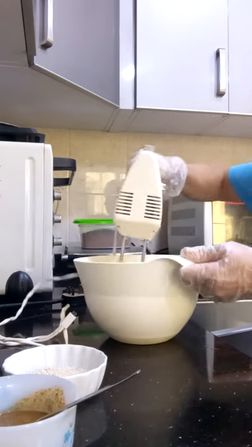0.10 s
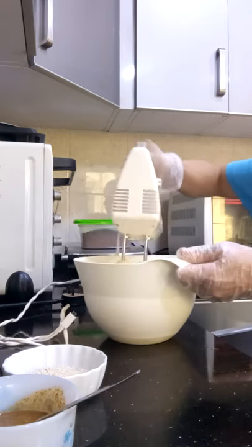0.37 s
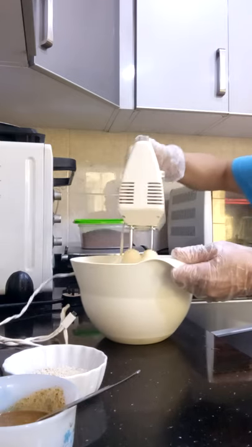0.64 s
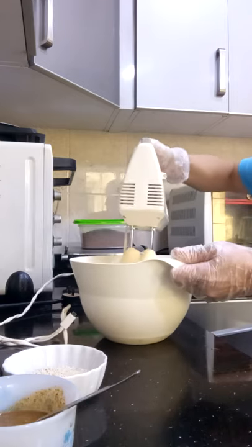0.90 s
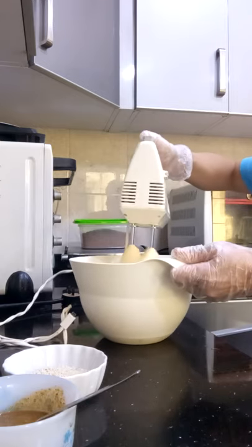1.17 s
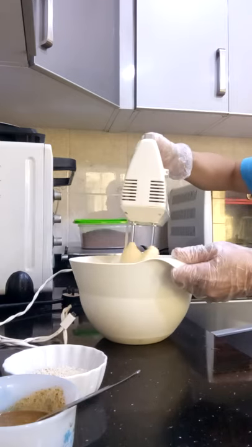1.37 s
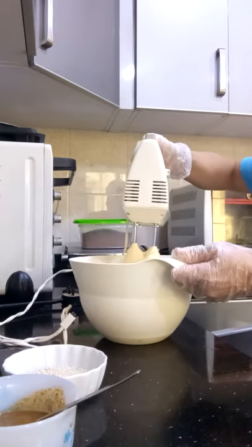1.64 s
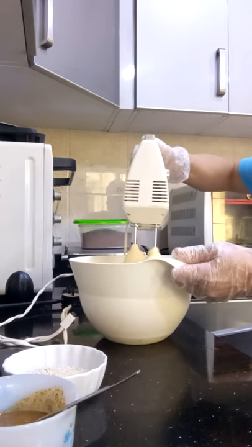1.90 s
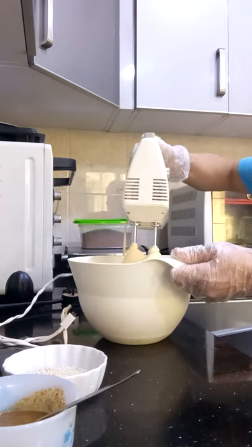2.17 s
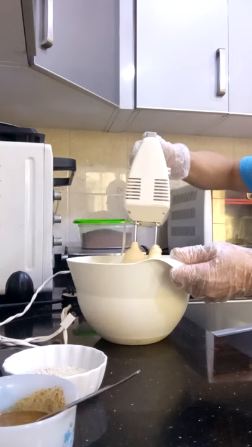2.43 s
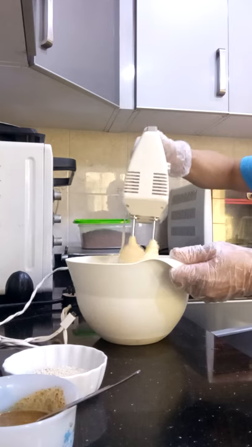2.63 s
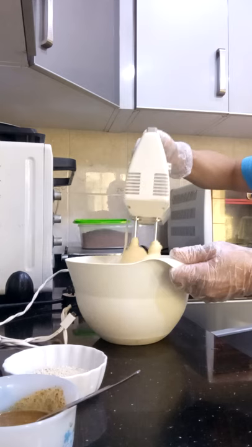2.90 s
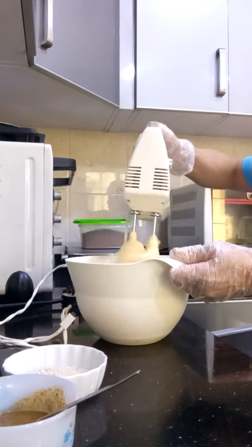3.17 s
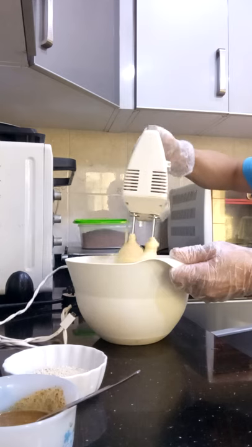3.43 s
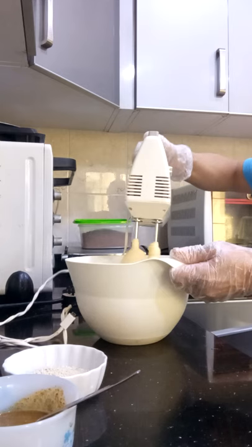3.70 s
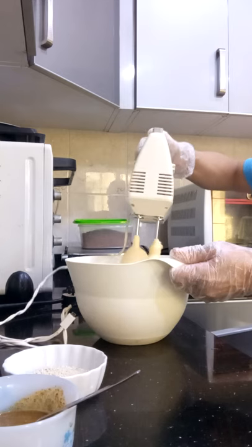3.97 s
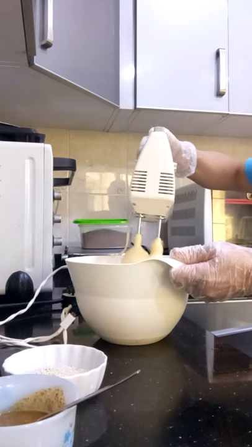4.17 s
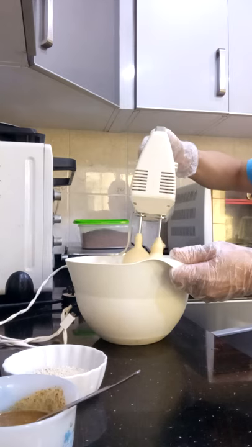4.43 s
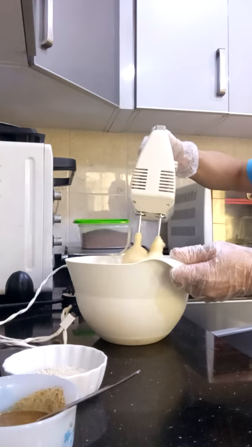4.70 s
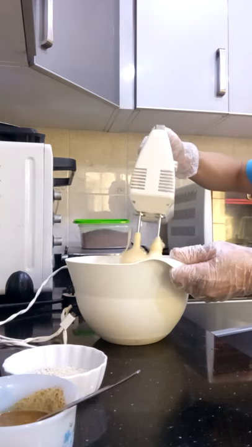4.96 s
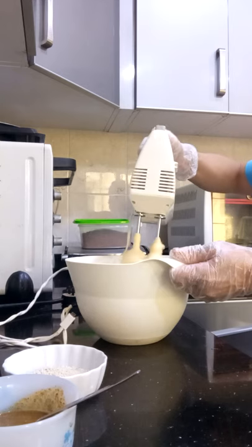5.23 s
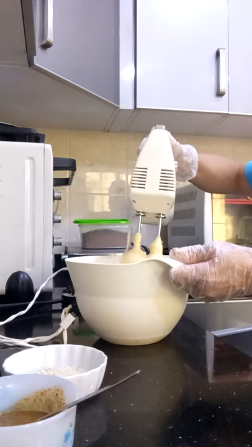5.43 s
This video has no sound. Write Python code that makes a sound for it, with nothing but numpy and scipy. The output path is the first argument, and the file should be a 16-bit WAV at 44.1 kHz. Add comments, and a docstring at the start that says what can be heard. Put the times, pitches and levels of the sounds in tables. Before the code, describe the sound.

A hand mixer runs close by in a small tiled kitchen, its motor whining over a rattling plastic roar and airy hiss. The bowl knocks quickly at the start. Switch clicks lower the speed, then raise it. Later the motor is cut, slides down in pitch and revs up again, followed by two shorter cuts and restarts. One microphone, centred, with a short bright echo.

```python
"""A hand mixer beats batter on a kitchen counter. Its mains motor whines at the commutator rate and roars
through the plastic housing; the thumb switch clicks through speeds and off, and the motor coasts down and
spins up. The bowl knocks on the counter, tiled walls answer and the kitchen hums faintly.
One microphone hears it all; everything but the clicks dips for a moment around each click."""
import sys
import numpy as np
from scipy import signal
from scipy.fft import rfft, irfft, next_fast_len
from scipy.io import wavfile
from scipy.ndimage import uniform_filter1d, map_coordinates

SR = 44100
rng = np.random.default_rng(int(sys.argv[2]) if len(sys.argv) > 2 else 0)


def wav_record(signal):
    """Record a signal, one row per channel, as 16-bit PCM in the file named by sys.argv[1]."""
    frames = np.transpose(np.atleast_2d(signal))
    bounded = np.clip(frames, -1, 1)
    # unit amplitude maps onto the largest positive 16-bit level
    quanta = np.round(bounded * 32767).astype(np.int16)
    wavfile.write(sys.argv[1], SR, quanta)


def volts_from_db(level):
    """Convert decibel levels to linear amplitude ratios."""
    exponent = np.asarray(level, float) / 20
    return 10 ** exponent


N = 246509
T = np.arange(N) / SR  # s
BARS = 12  # commutator bars
FULL_RPS = 180  # shaft turns per s at which the motor levels are stated

# presses of the thumb switch: click_s, click_level_db, dip_weight_db (scaled by the curve of the dip)
SWITCH_CLICKS = [(0.857, -20, -7.5), (1.933, -12, -6.5), (2.6113, -18.5, -2.5), (3.028, -15.5, -5.5),
                 (3.7078, -16.5, -4), (3.7472, -16.5, -1.5), (4.3358, -15.5, -7.5), (4.556, -15, -9),
                 (5.069, -17, -7.5), (5.3096, -12.5, -7)]
# depth of the mains throb on the 1st, 2nd and 3rd harmonic of the whine: depth_ratio
THROB_DEPTHS = [.8, .4, .55]


def unit(x):
    """Scale to rms 1."""
    return x / np.sqrt(np.mean(x ** 2) + 1e-20)


def filtered(x, response):
    """x times a complex response of frequency."""
    m = next_fast_len(N + 8192)
    return irfft(rfft(x, m) * response(np.fft.rfftfreq(m, 1 / SR)), m)[:N]


def shaped(x, spectrum):
    """x coloured by a (Hz, dB) spectrum read on log Hz, at rms 1."""
    hz, db = np.transpose(spectrum)
    return unit(filtered(x, lambda f: volts_from_db(np.interp(np.log(f + 1), np.log(hz), db, -120, -120))))


def coloured(spectrum):
    """Coloured noise of rms 1."""
    return shaped(rng.standard_normal(N), spectrum)


def wobble(rate):
    """A smooth random curve, rate knots a second."""
    return map_coordinates(rng.standard_normal(int(N * rate / SR) + 4), [T * rate])


def powered():
    """1 while current flows, else 0."""
    # motor switched off: from_s, to_s
    off_spans = [(3.027, 3.707), (4.335, 4.555), (5.067, 5.308)]
    return 1 - sum((T > a) & (T < b) for a, b in off_spans)


def shaft_speed():
    """Under current the rotor lags towards its pull; without, friction brakes it, easing off near a crawl."""
    # speed that switch setting and batter load pull the shaft towards: time_s, turns_per_s
    pull_points = [(0.0, 178.1), (0.12, 163.7), (0.28, 164.9), (0.36, 174.6), (0.68, 188.1), (0.855, 185.9),
                   (0.857, 144.1), (1.932, 149.7), (1.934, 168.6), (2.55, 180.7), (2.72, 173.6),
                   (2.84, 191.7), (3.03, 161.0), (3.74, 76.4), (3.75, 181.2), (4.1, 187.0), (4.33, 204.7),
                   (4.56, 143.6), (4.62, 191.7), (4.78, 192.0), (5.07, 210.7), (5.31, 193.3), (5.6, 193.7)]
    start_rps, spin_up_s = 178, .16
    brake_rps_per_s, crawl_rps, ease = 315.1, 43.7, 3.8
    t = np.arange(0, N / SR + .002, .001)  # one step a millisecond
    pull = np.interp(t, *np.transpose(pull_points))
    on = np.interp(t, T, powered()) > .5
    speed = [start_rps]
    for goal, driven in zip(pull, on):
        now = speed[-1]
        if driven:
            push = (goal - now) / spin_up_s
        else:
            push = -brake_rps_per_s * np.tanh(now / crawl_rps) ** ease
        speed.append(now + push * t[1])
    return np.interp(T, t, speed[:-1])


def ripple(depth, lag):
    """Torque throbs at twice the mains rate while current flows."""
    mains_hz = 50
    return 1 + depth * powered() * np.cos(4 * np.pi * mains_hz * T - lag)


def housing(f):
    """Causal sum of the resonances of housing and bowl, alternating in sign."""
    # resonances: centre_hz, width_hz, relative_db
    resonances = [(599, 37, -15), (720.6, 35.7, -2), (965.5, 41, -7), (1047.7, 33.2, 3.5),
                  (1092.3, 39.3, 0), (1155, 32.4, -1), (1272, 21, -17.5), (1370, 16, -53),
                  (2085, 200, -15.5), (2922, 40, -5.5), (3116, 93, -10), (4210, 140, -13), (6920, 140, -12),
                  (7624, 91, -9)]
    return sum((-1) ** k * volts_from_db(db) * 1j * f * width / (centre ** 2 - f * f + 1j * f * width)
               for k, (centre, width, db) in enumerate(resonances))


def rotor_noise(turns, share, drift):
    """Noise of which a share repeats every shaft turn, its pattern drifting by drift patterns a second."""
    spots = 256  # rough spots around the rotor
    pattern = rng.standard_normal((int(N * drift / SR) + 4, spots))
    repeat = map_coordinates(pattern, [T * drift, turns % 1 * spots], mode="grid-wrap")
    share = np.clip(share, 0, 1)
    return np.sqrt(share) * unit(repeat) + np.sqrt(1 - share) * rng.standard_normal(N)


def commutator_line(k, db, turns, slack):
    """Harmonic k of the bar rate: an eccentric commutator swells it once a turn, bouncing brushes roughen it."""
    swell = 1 + .27 * np.cos(2 * np.pi * turns + wobble(3))
    rough = volts_from_db(1.2 * wobble(20)) * (1 + .2 * wobble(250))
    return volts_from_db(db) * swell * rough * np.sin(k * (2 * np.pi * BARS * turns + slack))


def commutator_whine(speed, turns, slack, coasting, facing_db):
    """Three harmonics, louder or softer as they sweep the resonances of the housing."""
    # whine under current: turns_per_s, first_db, second_db, third_db
    radiation = [(35, -64, -76, -66), (59.4, -44, -56, -65), (83.4, -26, -70, -39), (95.2, -17, -62, -46),
                 (110, -33, -51, -41), (124, -28, -29, -44), (131.7, -37, -29, -47),
                 (145, -42.5, -47.5, -58), (155, -43, -53, -51), (155, -41, -50.5, -50),
                 (161.7, -41, -45, -39), (173.1, -34.5, -39.5, -38), (172, -39.5, -38.5, -37.5),
                 (175.7, -37.5, -34.5, -40), (179.8, -37.5, -41, -42), (179, -39, -40, -41),
                 (181.5, -40.5, -36.5, -33.5), (198, -39, -47, -31)]
    # each harmonic coasting at full speed, before the housing colours it: level_db
    coast_db = [-41, -36, -42]
    # its fall per halving of speed, one per harmonic: fall_db
    coast_fall_db = [3.5, 9, 11]
    # how much of the facing each harmonic feels under current: ratio
    aims = [.6, 1.7, 1.2]
    ring_share = .55  # how strongly the housing colours the coasting whine
    rps, *radiated = np.transpose(radiation)
    whine = np.zeros(N)
    for i in range(3):
        k = i + 1
        driven_db = np.interp(speed, rps, radiated[i]) + aims[i] * facing_db
        # a coasting rotor is heard mostly where it crosses a housing resonance
        rung_db = ring_share * 20 * np.log10(np.abs(housing(k * BARS * speed)))
        free_db = coast_db[i] + coast_fall_db[i] * np.log2(speed / FULL_RPS) + rung_db
        db = (1 - coasting) * driven_db + coasting * free_db + 1.4 * wobble(11)
        whine += ripple(THROB_DEPTHS[i], 2.8) * commutator_line(k, db, turns, slack)
    return whine


def gear_rattle(turns):
    """Rough gear noise rings the housing, over a broad motor roar."""
    # roar under the resonances: frequency_hz, relative_db
    roar_spectrum = [(450, -38), (640, 1.5), (2000, 0), (4500, -9), (6000, -30)]
    teeth = rotor_noise(turns, share=0.21, drift=2.962) * volts_from_db(2.2 * wobble(300)) * ripple(.19, 3.9)
    return unit(filtered(teeth, housing)) + volts_from_db(-6) * shaped(teeth, roar_spectrum)


def fan_and_brushes(turns, slack):
    """Air and brush hiss, with thin upper lines of the commutator in it."""
    # hiss of fan air and brushes: frequency_hz, relative_db
    hiss_spectrum = [(2650, -6), (4500, -13.5), (4600, -8.5), (5220, -9.5), (5830, 0), (6310, 0),
                     (7750, -3), (8710, -11), (10000, -18), (11300, -14), (12900, -15.5), (13600, -21),
                     (14900, -3.5), (15900, -4)]
    # higher harmonics, before current and hiss spectrum scale them: multiple, level_db
    overtones = [(4, -14), (5, -20), (6, -13)]
    mesh = (31 / BARS, -22.5)  # a faint tone at 31 cycles per shaft turn, perhaps gear teeth
    lines = sum(commutator_line(k, db, turns, slack) for k, db in overtones + [mesh])
    # sparking edges sharpen the whine under current
    thin = (0.3 + 0.59 * powered()) * ripple(THROB_DEPTHS[2], 2.8) * lines
    air = rotor_noise(turns, share=0.22, drift=3.99) * ripple(0.03, 2.5)
    return shaped(air + thin, hiss_spectrum) * volts_from_db(0.33 * wobble(400))


def motor():
    """Commutator whine, gear rattle in the housing, rumble and hiss, all following the shaft."""
    # how squarely the vents face the microphone as the hand moves: time_s, facing_db
    facing = [(0, 3), (.1, 2), (.3, 1.5), (.5, 2.5), (.7, -1), (.85, -1.5), (1, 2), (1.2, 3), (1.6, 4),
              (2, 1), (2.25, -0.5), (2.5, 1), (2.7, -1), (3, -1.5), (3.5, -1.5), (3.9, 1), (4.15, -1),
              (4.3, -2), (4.7, 0), (5.05, -1.5), (5.3, 3), (5.59, -1.5)]
    # rumble through bowl and counter: frequency_hz, relative_db
    rumble_spectrum = [(30, -36), (60, -18), (88, -17.5), (100, -13.5), (150, 2.5), (180, -11), (199, 6.5),
                       (220, -14), (240, -2.5), (260, -11.5), (400, -9), (520, -13), (600, -76)]
    # each layer: full_speed_db, db_per_doubling_of_speed, hard_acceleration_db, without_current_db (last two added)
    rattle_layer = (-35, 10, 7, 0)
    air_layer = (-35, 11, 4.5, 1.9)
    rumble_layer = (-52.5, 0.3, -3, -2.5)
    # the field builds and collapses gently, which rounds the corners of the speed
    speed = uniform_filter1d(shaft_speed(), size=SR // 40)
    turns = np.cumsum(speed) / SR + 0.002 * wobble(40)
    facing_db = np.interp(T, *np.transpose(facing))
    gaining = np.clip(np.gradient(speed) * SR / 400, 0, 1)  # 1 from 400 turns per s per s
    coasting = uniform_filter1d(1. - powered(), size=SR // 50)
    # the gears chatter when coasting or gaining speed, and the upper lines blur
    slack = (.6 * coasting + .3 * gaining) * wobble(200)

    def level(full_db, slope_db, strain_db, off_db):
        return full_db + slope_db * np.log2(speed / FULL_RPS) + strain_db * gaining + off_db * coasting

    rattle_db = level(*rattle_layer) + 0.2 * facing_db + 1.4 * wobble(12)
    hiss_db = level(*air_layer) + .1 * facing_db + 1.0 * wobble(6.5)
    rumble_db = level(*rumble_layer) + 0.63 * facing_db + 2.47 * wobble(6)
    # the fan's air flow cannot change abruptly
    hiss_db = uniform_filter1d(hiss_db, size=SR // 16)
    # the beaters pass the bowl wall once every six shaft turns
    beat = 1 + .09 * np.cos(2 * np.pi * turns / 6)
    whine = commutator_whine(speed, turns, slack, coasting, facing_db)
    rumble = volts_from_db(rumble_db) * coloured(rumble_spectrum)
    rattle = volts_from_db(rattle_db) * gear_rattle(turns)
    hiss = volts_from_db(hiss_db) * fan_and_brushes(turns, slack)
    return whine + rumble + beat * (rattle + hiss)


def room(x):
    """Tiled walls answer with a dense tail whose treble dies first."""
    t = np.arange(SR // 2) / SR
    slow, fast = rng.standard_normal((2, len(t)))
    tail = uniform_filter1d(slow, size=5) * volts_from_db(-60 * t / 0.68) + 0.78 * fast * volts_from_db(-60 * t / 0.28)
    tail = np.pad(tail / np.linalg.norm(tail), (SR // 200, 0))  # the walls answer 5 ms late
    return signal.fftconvolve(x, tail)[:N]


def kitchen():
    """Room noise and slightly unsteady appliance whine."""
    # room noise: frequency_hz, relative_db
    room_spectrum = [(18, -59), (30, -26), (100, -4), (209, -17), (245, 6.5), (265, -24), (302, -2.5),
                     (436, -21), (718, -5.5), (3560, -78), (3850, -22), (4510, -15.5), (15900, -49)]
    # appliance whine, its level wavering: pitch_hz, mean_level_db
    appliance_tones = [(3995, -62.5)]
    tones = sum(volts_from_db(db + 5.1 * wobble(11)) * np.sin(2 * np.pi * hz * T + 0.23 * wobble(7.5))
                for hz, db in appliance_tones)
    noise_db = -61.0 + 1.6 * wobble(4.11) + 6.3 * wobble(30)
    return volts_from_db(noise_db) * coloured(room_spectrum) + tones


def knocks():
    """The bowl knocks on the counter: decaying modes, the high ones a short crack, the low ones a longer thud."""
    # knocks: start_s, level_db
    knock_times = [(0.113, -24), (.131, -17), (0.167, -21.5)]
    # modes of the plastic bowl: pitch_hz, relative_db, t60_s
    bowl_modes = [(147, -12, 0.098), (372, -7.5, 0.029), (624, 2.5, 0.014), (1032, 1, 0.021)]
    out = np.zeros(N)
    for s, db in knock_times:
        t = np.maximum(T - s, 0)
        modes = sum(volts_from_db(mode_db - 60 * t / t60) * np.sin(2 * np.pi * hz * t) for hz, mode_db, t60 in bowl_modes)
        out += volts_from_db(db) * (1 - np.exp(-t / 0.0026)) * modes
    return out


def dips():
    """The level drops just ahead of each click, holds, and slides back."""
    edges = [-.017, -.009, -.001, .004, .03, .055]  # s around the click
    weights = [0.0091, 1.43, 1.9, 1.76, 1.2, 0.038]
    return volts_from_db(sum(dip_db * np.interp(T - s, edges, weights) for s, _, dip_db in SWITCH_CLICKS))


def switch():
    """Each click is a bright snap, a weaker, longer room tail and a ring of the housing."""
    # switch snap: frequency_hz, relative_db
    snap_spectrum = [(240, -65), (400, -54), (734, 10.5), (1100, 7.5), (1410, -2), (3030, 5), (5730, -2.5),
                     (7230, 10.5), (12300, -8), (15300, 15), (16500, -32)]
    snap, tail = coloured(snap_spectrum), coloured(snap_spectrum)
    body = unit(filtered(rng.standard_normal(N), housing))
    out = np.zeros(N)
    for s, db, _ in SWITCH_CLICKS:
        t = np.maximum(T - s + 0.0013, 0)
        rise = 1 - np.exp(-t / .0006)
        out += volts_from_db(db - 10) * rise * (volts_from_db(-60 * t / 0.044) * snap + volts_from_db(-12.5 - 60 * t / 0.28) * tail)
        out += volts_from_db(db - 27.5 - 60 * t / 0.31) * rise * body
    return out


def scene():
    """Everything reaches one microphone, heard alike on both channels."""
    mixer = motor() + knocks()
    wet_db = -9
    mono = dips() * (mixer + volts_from_db(wet_db) * room(mixer) + kitchen()) + switch()
    return np.array([mono, mono])


def low_pass(x):
    """Removes everything above the highest recorded frequency."""
    return signal.sosfilt(signal.butter(12, 17120, fs=SR, output="sos"), x)


def record(dry):
    """The finished mix, as it is kept."""
    return low_pass(dry)


dry = scene()
out = record(dry)
wav_record(out)
```